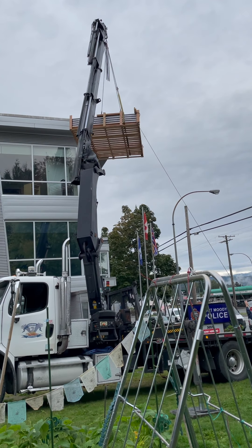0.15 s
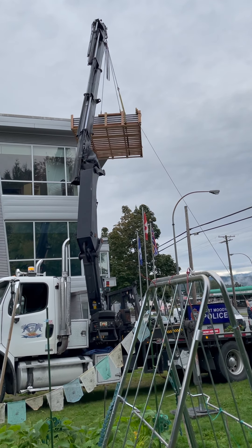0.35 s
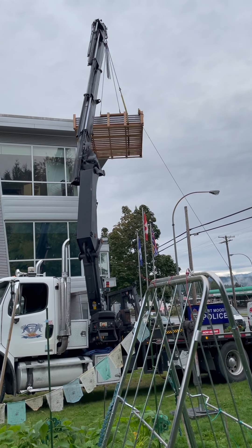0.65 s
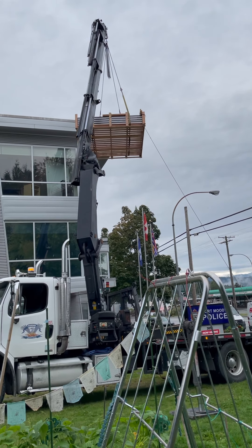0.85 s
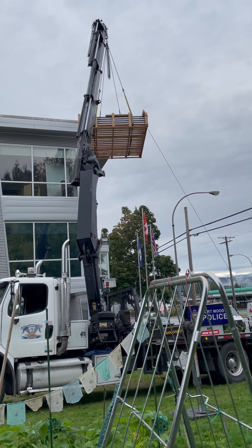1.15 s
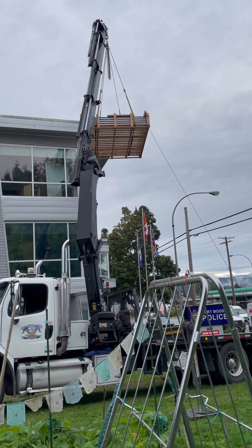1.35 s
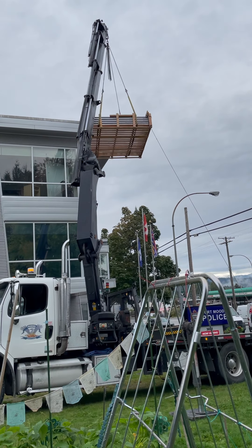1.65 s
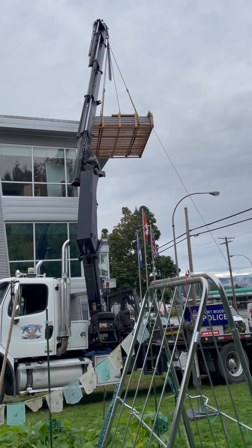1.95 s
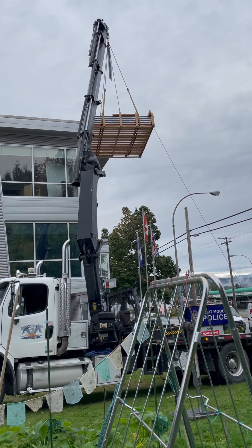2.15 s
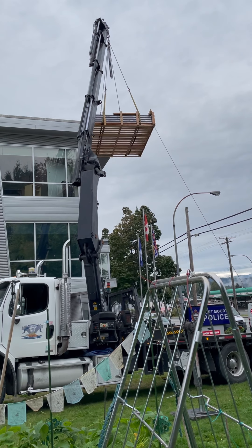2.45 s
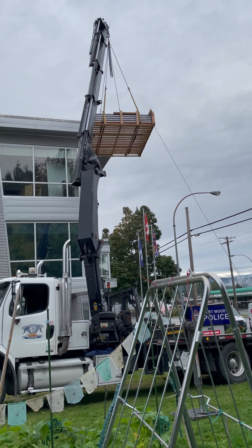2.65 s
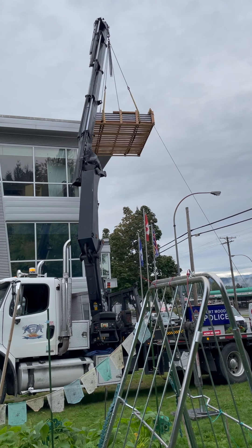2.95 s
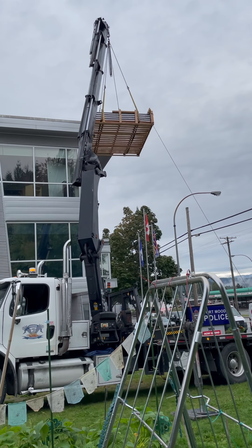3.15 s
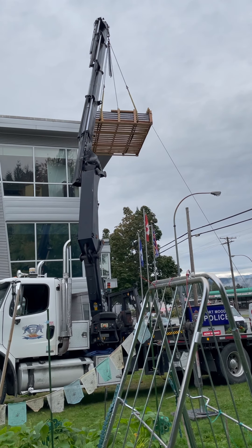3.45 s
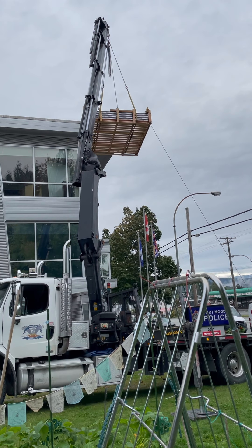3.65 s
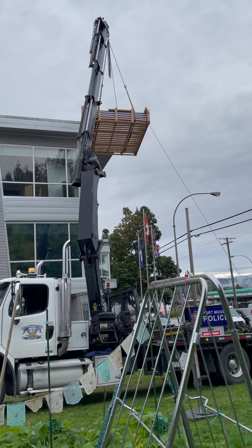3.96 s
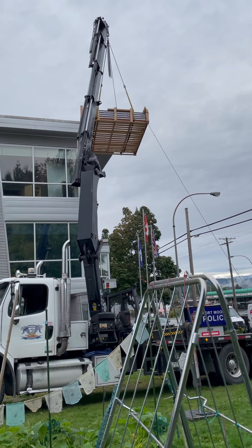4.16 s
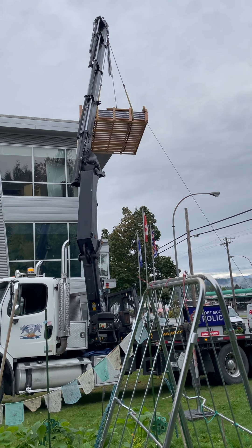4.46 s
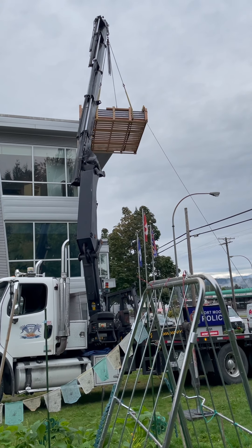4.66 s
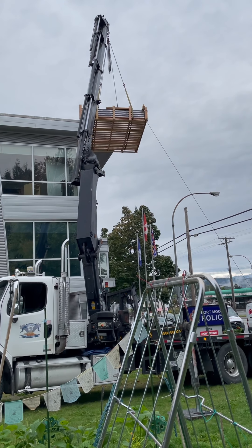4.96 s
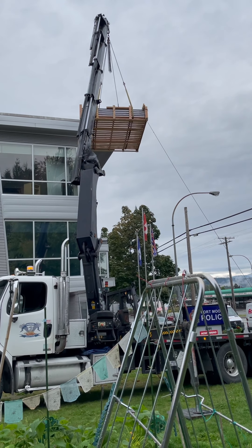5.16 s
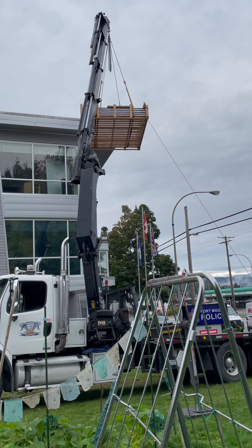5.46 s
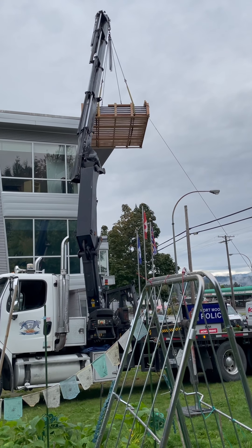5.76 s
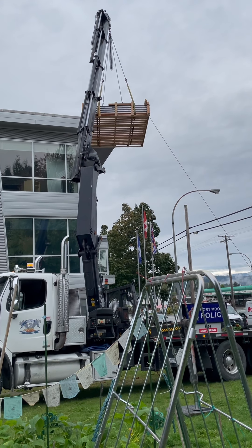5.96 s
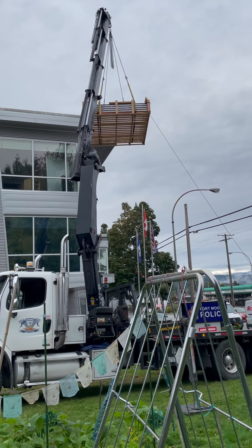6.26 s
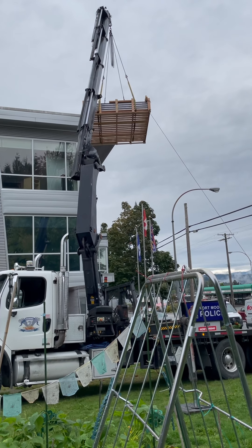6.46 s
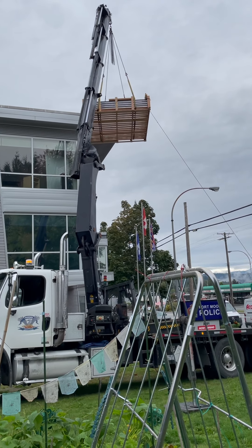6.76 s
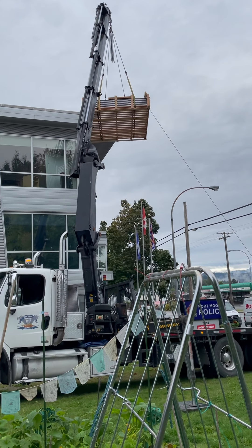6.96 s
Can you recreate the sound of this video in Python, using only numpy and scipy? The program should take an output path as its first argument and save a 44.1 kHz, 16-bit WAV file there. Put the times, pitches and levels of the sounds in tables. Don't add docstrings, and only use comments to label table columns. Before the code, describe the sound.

From the first instant a large truck diesel is already running at a steady fast idle, continuing to the cut at about 7 seconds. Its exhaust gives a low, buzzing hum with quick, blurred pulses, barely varying in speed. Above it sits a constant gear and hydraulic pump whine, surrounded by broad combustion, fan and oil-flow roar and fine metallic clatter. Around 1 second the pump's upper octave brightens, near 3 it sags, at about 4.4 it leaps briefly, and near 5.6 it rises again. A fan note beats slowly beneath. Road rumble and tyre hiss dip around 1.5 seconds, then build from 4 onward. A slow vehicle approaches, labouring briefly near 6.3, its low boom and axle whine strongest at the end. Outdoors, handheld stereo, several metres away, with little echo.

```python
import sys
import numpy as np
from scipy import signal
from scipy.fft import rfft, irfft, next_fast_len
from scipy.io import wavfile

SR = 44100
rng = np.random.default_rng(int(sys.argv[2]) if len(sys.argv) > 2 else 0)


def attenuation_scalar(level_db):
    decades = np.asarray(level_db, float) / 20
    return 10 ** decades


def waveform_to_disk(signal):
    frames = np.transpose(np.atleast_2d(signal))
    scaled = np.clip(frames, -1, 1) * 32767
    samples = np.round(scaled).astype(np.int16)
    wavfile.write(sys.argv[1], SR, samples)


N = 313110
SIZE = next_fast_len(N + 4096)
CONTROL_STEP = 64


def rms_one(x):
    return x / np.sqrt(np.mean(x ** 2) + 1e-20)


def in_time(rows):
    s, *columns = np.transpose(rows)
    return [np.interp(np.arange(N) / SR, s, c) for c in columns]


def grid_hz():
    return np.maximum(np.arange(SIZE // 2 + 1) * SR / SIZE, 1)


def in_hz(rows):
    hz, *columns = np.transpose(rows)
    return [np.interp(np.log(grid_hz()), np.log(hz), c) for c in columns]


def stretch(coarse):
    return np.interp(np.arange(N) / CONTROL_STEP, np.arange(len(coarse)), coarse)


def drift(rate_hz):
    r = np.exp(-2 * np.pi * rate_hz * CONTROL_STEP / SR)
    settle = 2000
    white = rng.standard_normal(N // CONTROL_STEP + 2 + settle)
    return rms_one(signal.lfilter([1], [1, -2 * r, r * r], white)[settle:])


def bump(middle_s, half_s):
    return np.exp(-((np.arange(N) / SR - middle_s) / half_s) ** 2)


def band(lo_hz, hi_hz):
    sos = signal.butter(3, [lo_hz, hi_hz], "band", fs=SR, output="sos")
    return rms_one(signal.sosfilt(sos, rng.standard_normal((2, N + SR)))[:, SR:])


def tone(turns, level_db, wobble_db, wander_rad, start_rad):
    angle_rad = 2 * np.pi * turns + stretch(start_rad + wander_rad * drift(7.6))
    wobble = stretch(attenuation_scalar(wobble_db * drift(5.2)))
    return np.sqrt(2) * attenuation_scalar(level_db) * wobble * np.cos(angle_rad)


def crank_turns():
    # t/s, speed/rpm
    speed = [(0, 625.98), (.35, 624.83), (.59, 625.55), (1.49, 625.8), (2.18, 624.43), (2.68, 624.21),
             (3.18, 625.05), (4.07, 624.03), (4.32, 622.75), (4.62, 624.13), (5.56, 624.46), (5.81, 623.9),
             (6.15, 624.92), (7.1, 623.91)]
    return np.cumsum(in_time(speed)[0]) / 60 / SR


def exhaust(crank):
    # order/crank, level/dB
    crank_orders = [(6, -30), (9, -35.5), (12, -29.8), (15, -33), (18, -33.3), (10, -45), (77, -47),
                    (5, -52), (7, -51), (8, -50), (11, -52), (13, -52), (14, -44), (16, -50), (17, -44),
                    (19, -51), (20, -45), (22, -39.5), (23, -49), (24, -50), (26, -48), (27, -47),
                    (30, -50), (46, -51), (51, -55), (58, -49), (68, -50), (72, -50), (90, -51)]
    first_pulse_turns, muffler_order, muffler_width = .1, 12.7, 2.5
    from_pulse = crank - first_pulse_turns
    uneven_rad = rng.uniform(-0.82, 2.74, len(crank_orders))
    out = 0
    for (k, db), rad in zip(crank_orders, uneven_rad):
        held_rad = 2 * np.arctan((k - muffler_order) / muffler_width)
        start_rad = (k % 3 > 0) * rad - held_rad
        out = out + tone(k * from_pulse, db, 0.76, 0.28, start_rad)
    return out


def pump_load():
    # middle t/s, half length/s, pump note change/dB, octave change/dB
    valves = [
        (1.0, 0.76, 0.7, 5),
        (2.9, 0.42, -3, -7),
        (4.383, 0.22, -1.5, 16),
        (5.6, 0.51, -1, 8),
    ]
    load_db = 0
    for s, half_s, note_db, octave_db in valves:
        load_db = load_db + bump(s, half_s) * np.array([[0], [note_db], [0], [octave_db]])
    return load_db


def gears(shaft):
    # order/shaft, level/dB
    shaft_orders = [(14, -44), (19, -45), (25, -45), (27, -47), (28, -46), (33, -51), (40, -49),
                    (46.17, -49), (47, -48), (49.79, -50), (51, -46.5), (53.08, -46.5), (60.17, -53),
                    (66, -52), (70, -57), (73, -56), (78, -52), (80, -57), (91, -60), (98, -47.5),
                    (104, -52), (105, -51.5), (119, -61), (130, -53), (131, -58), (132, -63), (155, -62),
                    (156, -56), (182, -62), (203, -70), (305, -76), (366.4, -74)]
    mesh_orders = (21, 26, 42, 52)
    mesh_db = (-28.1, -32, -43.5, -49.5)
    mesh_wobble_db = (0.17, .8, 1.3, 2.7)
    out = 0
    for k, db in shaft_orders:
        out = out + tone(k * shaft, db, 1.7, .0015 * k, rng.uniform(0, 2 * np.pi))
    for k, db, load_db, wobble_db in zip(mesh_orders, mesh_db, pump_load(), mesh_wobble_db):
        out = out + tone(k * shaft, db + load_db, wobble_db, 0.074, 0)
    return out


def clatter(turns, level_db, blur_turns):
    size = round(N / turns[-1])
    place = (turns + blur_turns * stretch(drift(2.43))) % 1 * size
    contacts = rng.standard_normal(size + 1)
    return attenuation_scalar(level_db) * rms_one(np.interp(place, np.arange(size + 1), contacts))


def roar(crank, shaft):
    # f/Hz, level/dB per Hz
    roar_spectrum = [(25, -82), (42, -66), (60, -58), (110, -58), (200, -59.5), (450, -60), (900, -60),
                     (1700, -67), (2350, -68.5), (2700, -73), (4300, -79), (8200, -89), (13000, -100),
                     (15000, -95)]
    # f/Hz, width/Hz, lift/dB
    panels = [(664, 120, 2.5), (1075, 97, -4), (1420, 160, 3.5), (2120, 570, 1), (2520, 160, -4),
              (2970, 60, 5), (3800, 370, 2.5), (4870, 200, 1), (5530, 680, 5), (7000, 1040, 6),
              (9550, 490, 5), (10770, 1060, 6)]
    lift_db = sum(db / (1 + (2 * (grid_hz() - hz) / width_hz) ** 2) for hz, width_hz, db in panels)
    direct, scattered = rng.standard_normal((2, N))
    loops = clatter(crank, -5.5, 0.00036)
    loops = loops + clatter(crank / 2, -9.5, 0.00029)
    loops = loops + clatter(shaft, -16, 0.00058)
    thin = signal.butter(2, 350, "high", fs=SR, output="sos")
    direct = attenuation_scalar(-1.5) * direct + signal.sosfilt(thin, loops)
    white = np.array([direct, scattered]) * np.sqrt(SR / 2)
    noise = irfft(rfft(white, SIZE) * attenuation_scalar(in_hz(roar_spectrum)[0] + lift_db), SIZE)[:, :N]
    throb_db = 0.23 * np.cos(2 * np.pi * crank) + 0.47 * np.cos(2 * np.pi * 3 * crank)
    throb_db = throb_db + 0.11 * np.cos(2 * np.pi * shaft)
    return noise * attenuation_scalar(throb_db + .25 * stretch(drift(1.5)) + .3 * stretch(drift(8)))


def fan(crank):
    # t/s, f/Hz
    blade_hz = [
        (0, 332.06),
        (1.1, 331),
        (2.4, 330.6),
        (3.9, 330.63),
        (4.9, 331.66),
        (7.1, 331.31),
    ]
    blades = tone(np.cumsum(in_time(blade_hz)[0]) / SR, -40.5, 0.77, 0.11, 1.9)
    pulley = tone(32 * crank, -43.5, 1.0, 0.11, 0)
    return blades + pulley


def low_hum(crank):
    return bump(2.5, 3.2) * tone(11.82 * crank, -42, 0.66, .1, 2.5)


def passing_vehicle():
    # t/s, crank f/Hz
    crank_hz = [
        (0, 21.3),
        (2, 21.82),
        (3.2, 22.17),
        (4.8, 22.53),
        (5.3, 22.52),
        (7.1, 22.96),
    ]
    # order/crank, level/dB
    side_orders = [(2, -7), (3.5, -9), (4, -2), (6, -14)]
    abreast_s, speed_m_per_s, closest_m = 7.1, 17, 5.8
    boom_db, boom_shielding = -20.5, 3.2
    axle_db, axle_shielding = -31.5, 0.81
    swell_s, swell_half_s, side_db = 6.34, 0.42, -32
    t = np.arange(N) / SR
    far_db = -20 * np.log10(np.hypot(1, speed_m_per_s * (abreast_s - t) / closest_m))
    turns = np.cumsum(in_time(crank_hz)[0]) / SR
    boom = attenuation_scalar(boom_db + boom_shielding * far_db)
    boom = boom + attenuation_scalar(-37) * bump(3.3, 1.9)
    firing = boom * tone(3 * turns, 0, 1.0, 0.2, .95)
    axle = tone(3.86 * turns, axle_db + axle_shielding * far_db, 1.8, 0.34, 0)
    side = sum(tone(k * turns, side_db + db, 1.5, 0.24, 0) for k, db in side_orders)
    return firing + axle + bump(swell_s, swell_half_s) * side


def traffic():
    # t/s, level/dB
    road = [
        (0, -6),
        (1.5, -11),
        (3, -6),
        (4.3, -3),
        (5, 0),
        (5.8, 0.5),
        (7.1, 2),
    ]
    busy_db, = in_time(road)
    rumble = attenuation_scalar(-32.5 + 0.73 * busy_db) * band(54.4, 108)
    drone = attenuation_scalar(-36.5 + 0.58 * busy_db) * band(110, 346)
    tyres = attenuation_scalar(-35 + busy_db) * band(784, 1195)
    return rumble + drone + tyres + passing_vehicle() * [[1], [0]]


def ports(direct, scattered):
    # f/Hz, left minus right/dB, likeness/0-1, left lead/rad
    port_pair = [(165, 0, .9995, 0), (330, .7, .95, .3), (620, 6.5, .86, .45), (1000, 3, .65, .6),
                 (1700, 1.2, .84, .6), (2400, -8, .4, .3), (2800, -4.5, .8, 2.7), (4100, -7, .45, 1.3),
                 (4900, 1.5, .82, 0), (7100, 0, .97, 3.0), (8100, 0, .97, 3.4), (11100, 0, .95, 6.35),
                 (14000, 0, .97, 9.42), (15800, 0, .8, 10.5)]
    margin = 2048
    balance_db, alike, lead_rad = in_hz(port_pair)
    alike = np.sqrt((1 + np.clip(alike, 0, 1)) / 2)
    direct = np.pad(direct, margin, "reflect", reflect_type="odd")
    scattered = np.pad(scattered, margin, "reflect", reflect_type="odd")
    same = alike * rfft(direct, SIZE)
    other = np.sqrt(1 - alike ** 2) * rfft(scattered, SIZE)
    even = np.sqrt(2 / (1 + attenuation_scalar(2 * balance_db)))
    left = even * attenuation_scalar(balance_db) * np.exp(.5j * lead_rad) * (same + other)
    right = even * np.exp(-.5j * lead_rad) * (same - other)
    return irfft([left, right], SIZE)[:, margin:margin + N]


def scene():
    crank = crank_turns()
    shaft = 94 / 33 * crank
    direct, scattered = roar(crank, shaft) + traffic()
    tones = exhaust(crank) + gears(shaft) + fan(crank) + low_hum(crank)
    return ports(direct + tones, scattered)


def low_pass(x):
    return signal.sosfilt(signal.butter(12, 15740, fs=SR, output="sos"), x)


def record(dry):
    edge_s = .002
    from_edge = np.minimum(np.arange(N), np.arange(N)[::-1])
    fade = np.clip(from_edge / (edge_s * SR), 0, 1)
    return low_pass(dry * fade)


dry = scene()
out = record(dry)
waveform_to_disk(out)
```